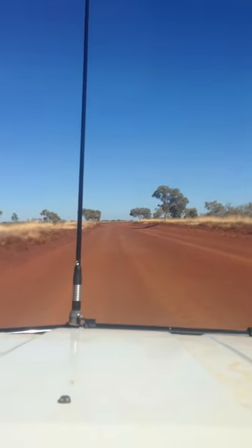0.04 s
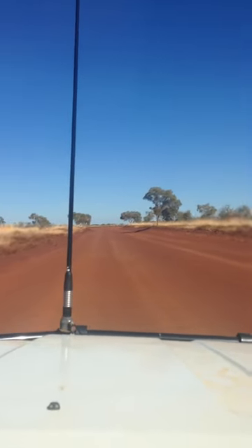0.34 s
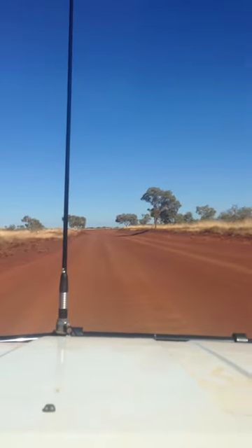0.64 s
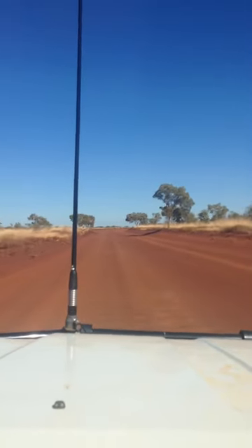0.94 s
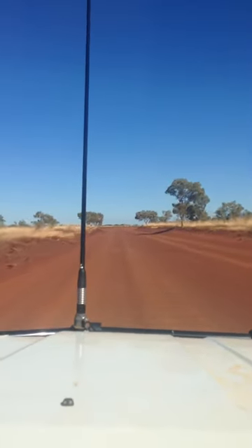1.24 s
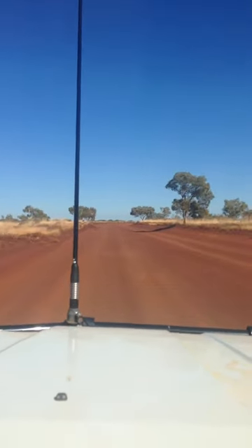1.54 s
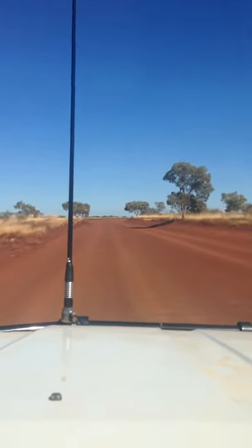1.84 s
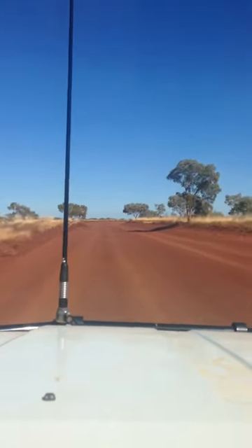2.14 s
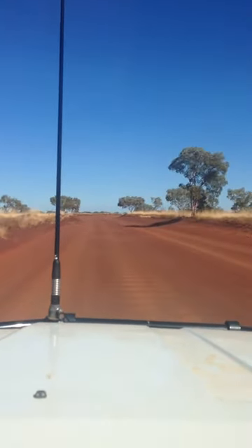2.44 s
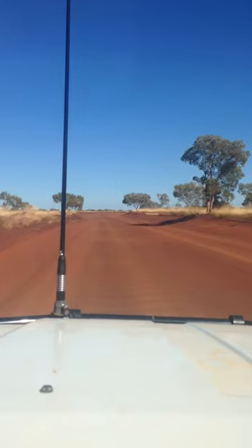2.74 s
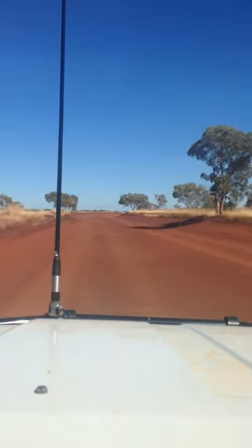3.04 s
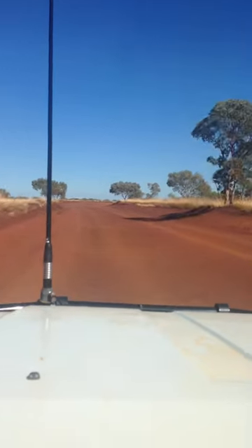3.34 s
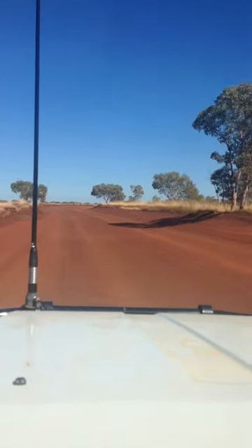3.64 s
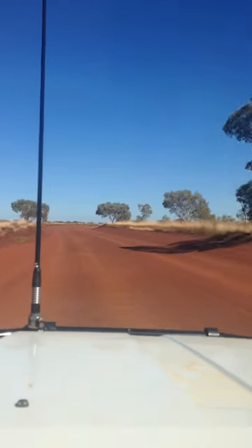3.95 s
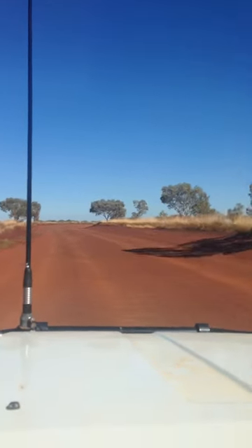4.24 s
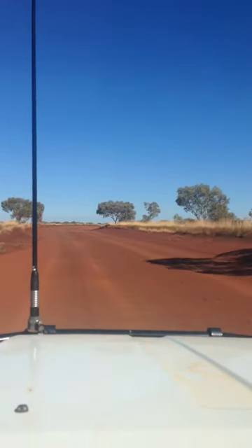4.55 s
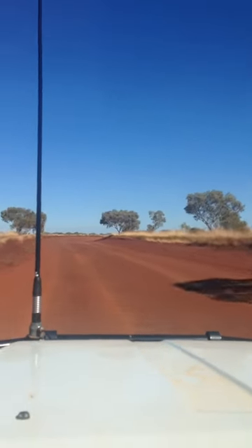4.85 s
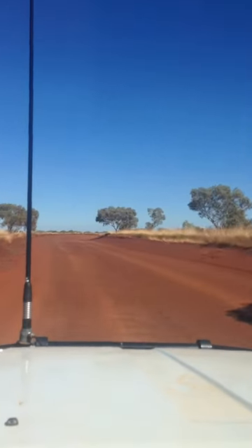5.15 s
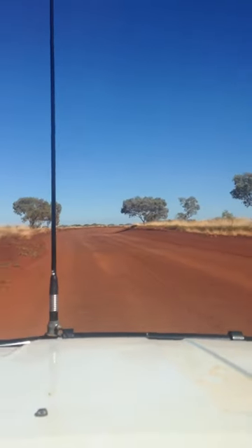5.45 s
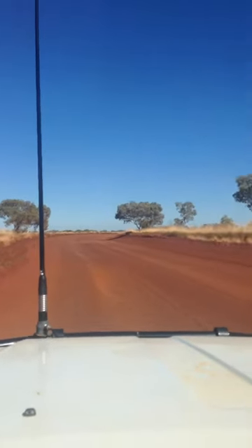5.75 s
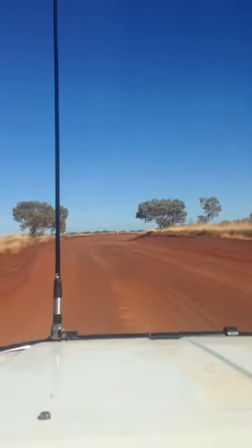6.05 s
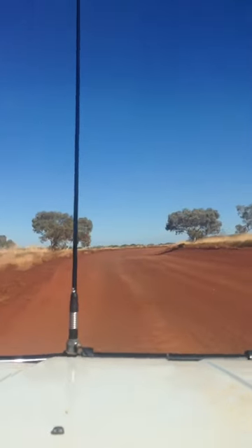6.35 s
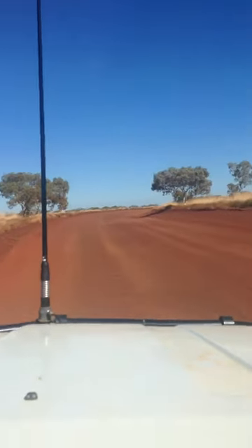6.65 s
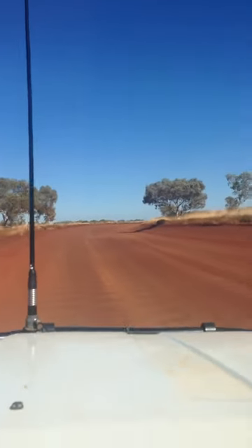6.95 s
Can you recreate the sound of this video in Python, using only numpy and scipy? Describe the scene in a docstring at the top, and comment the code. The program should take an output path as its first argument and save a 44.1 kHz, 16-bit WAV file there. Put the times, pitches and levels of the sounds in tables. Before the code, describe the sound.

A four-wheel drive runs fast along a corrugated dirt road, heard from inside the cab behind the windscreen. A deep boom and drumming panels dominate throughout, with irregular low thuds from ruts several times a second. Soft tyre and air rush and a faint, steady engine hum lie underneath. The first second is mostly rumble and bumps. From about 1 to 1.7 seconds, loose trim and gear rattle and clink close by, then ease to lighter chatter. A stronger burst of clatter comes between 3 and 3.7 seconds. From about 4 to 5.1 seconds the road is rough, with grit spraying and single stones cracking under the floor. Another dense stretch of rattling, knocks and gravel follows from about 5.3 to 6.3 seconds. Tiny, high, scratchy trim squeaks dot the rough patches, and the thuds and rattles carry on to the end at about 7 seconds.

```python
"""Inside a four-wheel drive, fast on a corrugated dirt road; one microphone behind the windscreen.
All around, the road makes the cab boom and its panels drum, and ruts thud through the suspension.
Close by, loose trim and gear rattle, clatter and squeak, most on the rough stretches, where grit
sprays under the floor. Tyre and air rush and a faint engine hum run on in the background."""
import sys
import numpy as np
from scipy import signal
from scipy.fft import rfft, irfft
from scipy.io import wavfile
from scipy.ndimage import uniform_filter1d, minimum_filter1d

SR = 44100
rng = np.random.default_rng(int(sys.argv[2]) if len(sys.argv) > 2 else 0)


def persist_wave(psi):
    """Save psi, clipped to +-1, as 16-bit WAV."""
    counts = np.round(np.clip(psi, -1, 1) * 32767).astype(np.int16)
    wavfile.write(sys.argv[1], SR, np.atleast_2d(counts).T)


N = 312669
TIME = np.arange(N) / SR
# bright spectrum of small hard contacts, for grit and gear: f/Hz, level/dB
BRIGHT_SPECTRUM = [(1500, -23.5), (2800, -7.5), (3300, -0.5), (4000, 1), (5000, -2.5), (6500, -7.5),
                   (8000, -10), (10000, -14), (12500, -17.5), (15500, -23.5)]


def cab_boom(throb):
    """Dips in the road heave the shell on its springs, and the air around the microphone booms."""
    # spectrum of the cab air: f/Hz, level/dB
    spectrum = [(12, -39), (20, -21), (27, -9.5), (34, -9.5), (41, -10), (49, 4), (60, 0), (74, -2.5),
                (88, -7), (115, -7.5), (150, -13.5), (220, -54.5), (500, -120)]
    # dips in the road: t/s, length/s, level/dB
    dips = [(0.06, 0.084, -25), (0.17, 0.46, -22), (1.18, 0.2, -14), (1.45, 0.31, -34), (2.3, 0.24, -19),
            (2.73, 0.16, -15), (3.09, 0.24, -24), (3.37, 0.23, -18), (3.98, 0.41, -17.5),
            (4.42, 0.18, -12.5), (4.68, 0.2, -23.5), (5.02, 0.079, -16), (5.24, 0.57, -23.5),
            (5.93, 0.34, -17.5), (6.38, 0.67, -19.5), (6.95, 0.16, -24)]
    boom = steady(colour(rng.standard_normal(N), spectrum), 0.069) * from_db(0.5 * throb)
    heave = np.sqrt(from_db(-20) ** 2 + stretches(dips))
    return boom * heave


def panel_drumming(drum_db, throb):
    """The road shakes the shell and its panels drum, louder on rough ground."""
    # spectrum of the panels: f/Hz, level/dB
    spectrum = [(60, -36.5), (100, -11), (130, 0), (190, 1.5), (230, -1.5), (270, -7.5), (320, -10),
                (420, -10.5), (520, -14), (750, -22), (1000, -27.5), (2000, -61.5), (6000, -110)]
    drumming = steady(colour(contacts(per_s=1500, spread_db=2.2), spectrum), 0.057)
    return drumming * from_db(-22 + 0.52 * drum_db + 2 * throb)


def rut_thuds():
    """Deep ruts thud up through the suspension."""
    # blows from the ruts: t/s, level/dB, f/Hz
    ruts = [(0.075, -8, 51), (0.327, -11.5, 66), (0.366, -12, 64), (0.488, -12, 59), (0.528, -14, 58.3),
            (0.729, -11.5, 74), (0.975, -8.5, 72), (1.114, -11, 78.4), (1.202, -13, 58.4), (1.34, -8, 67),
            (1.505, -16, 68.6), (1.589, -8.5, 60), (1.64, -9, 67), (1.722, -12, 69), (1.85, -12, 72),
            (1.92, -12, 57.6), (2.069, -13.5, 49), (2.19, -13.5, 55), (2.303, -10, 71), (2.405, -8.5, 58),
            (2.502, -3, 62.5), (2.713, -11, 63), (2.926, -16, 58.5), (3.105, -4.5, 59), (3.204, -9, 56),
            (3.268, -15, 54.7), (3.437, -11, 69), (3.64, -8.5, 59.4), (3.844, -7, 55), (4.008, -10, 67),
            (4.172, -6, 56.7), (4.493, -6.5, 65.6), (4.635, -11.5, 72), (4.79, -11.5, 71.4),
            (4.848, -8, 69.5), (4.928, -6.5, 60.3), (5.238, -9.5, 56.3), (5.366, -15, 63), (5.937, -10, 62),
            (6.101, -10.5, 58.3), (6.195, -7, 56.6), (6.268, -3.5, 62), (6.579, -8, 64.5), (6.657, -7, 60),
            (6.743, -11, 61.5), (6.829, -4, 60.4), (6.906, -11, 69)]
    return knocks(ruts, gain_db=11.5, rise_s=0.011, decay_s=0.015)


def wheel_bumps():
    """A wheel hits a bump and a panel rings."""
    # blows from the bumps: t/s, level/dB, f/Hz
    bumps = [(0.334, -2, 123), (0.504, -8, 124), (0.976, -15, 135), (0.99, -20, 296), (1.048, -20, 373),
             (1.233, -15, 283), (1.333, -11, 150), (1.623, -9, 139), (1.64, -20, 323), (1.717, -11, 148),
             (1.845, -8, 119), (2.038, -11, 134), (2.213, -18.5, 316), (2.34, -19, 364), (2.377, -18, 362),
             (2.572, -13.5, 145), (2.579, -21, 291), (2.72, -13, 196), (3.07, -17, 408), (3.173, -15, 358),
             (3.206, -7, 172), (3.236, -17.5, 306), (3.268, -11.5, 323), (3.352, -16, 273),
             (3.528, -3, 163), (3.988, -14.5, 274), (4.237, -9, 152), (4.239, -12.5, 307),
             (4.479, -5, 163.4), (4.526, -18, 300), (4.557, -7, 138), (4.667, -14, 181),
             (4.824, -10.5, 427), (4.841, -1.5, 159), (4.938, -22, 286), (4.982, -6, 146),
             (5.059, -14, 263), (5.065, -3.5, 129), (5.286, -13, 116), (5.381, -10, 157), (5.396, -9, 350),
             (5.446, -8, 152), (5.541, -8, 175), (5.598, -17.5, 315), (5.837, -15, 305), (5.756, -4.5, 261),
             (5.794, -5.5, 250), (5.906, -13, 330), (5.933, -6, 152), (6.01, -10.5, 280), (6.045, -4, 127),
             (6.089, -9.5, 193), (6.109, -12, 288), (6.166, -4.5, 194), (6.262, -7, 146),
             (6.344, -9.5, 174), (6.514, -9, 120), (6.628, -10.5, 158), (6.685, -5.5, 144),
             (6.687, -14, 370), (6.754, -5.5, 173), (6.809, -9.5, 220), (6.822, -9, 174)]
    return knocks(bumps, gain_db=3, rise_s=0.0048, decay_s=0.011)


def trim_rattle(rough_db, shake):
    """Trim near the microphone chatters in time with the ridges; small hard things jangle along."""
    force = contacts(per_s=8000, spread_db=1.13) * from_db(1.6 * shake + 0.5 * drift(40))
    force += from_db(-9.5) * jangle(count=5000, decay_s=0.0057, spread_db=3.5)
    chatter = cab_tail(loose_parts(force, ring_db=-9, swing_db=7), wet_db=-13)
    return steady(chatter, 0.033) * from_db(-32 + rough_db)


def gear_clatter():
    """Thrown gear lands in a flurry of contacts and chatters to rest; the body answers with a knock."""
    # landings: t/s, level/dB, bright part against that level/dB
    landings = [(0.172, -24, -8), (0.4824, -28, -12), (0.519, -28, -9), (1.031, -18.5, -11),
                (1.221, -10, -5), (1.24, -17, -8), (1.334, -13.5, 1.5), (1.372, -24, -12), (1.468, -21, -3),
                (2.046, -33, -8), (2.345, -16.5, -20), (2.385, -20.5, -15), (3.1266, -20, 1),
                (3.168, -18, 1), (3.202, -14.5, 3), (3.242, -10.5, -5), (3.278, -18, -3), (3.31, -15, -2),
                (3.355, -13.5, 0), (3.376, -15, -8), (3.398, -11.5, -11), (3.447, -11, -6), (3.477, -17, 3),
                (3.659, -13.5, -17), (3.676, -26, -4), (3.714, -16, -14), (3.743, -30, 11),
                (3.9793, -20.5, 3.5), (4.081, -13.5, -4), (4.135, -22, 4), (4.243, -18, 8.5),
                (4.394, -20, -8), (4.417, -16, -2), (4.495, -9, -4), (4.539, -13, -2), (4.9063, -29, 14.5),
                (5.085, -20, -3), (5.26, -24, 0), (5.221, -15, -2.5), (5.387, -12, 4), (5.441, -11, -4),
                (5.462, -18, -7), (5.48, -22, 1), (5.546, -22.5, 6), (5.561, -15.5, -1), (5.63, -19, 2),
                (5.656, -22, 2), (5.72, -20, 5), (5.751, -9.5, 0.5), (5.796, -14, 5), (5.835, -20, -13),
                (6.009, -13.5, 2.5), (6.029, -18.5, -10), (6.055, -13.5, -8), (6.1, -20, -8),
                (6.14, -20, -10), (6.192, -24, 6), (6.316, -20, -13), (6.357, -17.5, -11),
                (6.528, -21, 1.5), (6.686, -25.5, 4), (6.7361, -28, 6), (6.748, -23, -3), (6.809, -15, -11),
                (6.8354, -34, 6), (6.93, -12, -25), (6.95, -33, 11), (6.975, -24, -8), (7.045, -18, -1)]
    times, dull_db, bright_db = np.transpose(landings)

    def flurry(db):
        """Each landing and its quieter settling, spread over 10 ms."""
        hit = bursts(times, db, rise_s=0.0055, decay_s=0.0071)
        settle = bursts(times, db - 19, rise_s=0.0071, decay_s=0.018)
        return uniform_filter1d(hit + settle, int(0.01 * SR) + 1)

    force = contacts(per_s=6000, spread_db=2.4) * flurry(dull_db)
    dull = loose_parts(force, ring_db=-5, swing_db=3)
    bright_force = contacts(per_s=9000, spread_db=1.8) * flurry(dull_db + bright_db)
    bright = colour(bright_force, BRIGHT_SPECTRUM)
    knock = from_db(21.5) * hollow_body(force)
    return from_db(-9) * cab_tail(dull + knock + bright, wet_db=-9.5)


def gear_jostle(rough_db, shake):
    """Heavier gear keeps knocking against the body, most of all on the ridges."""
    force = contacts(per_s=900, spread_db=2.9) * from_db(1.5 * shake)
    return steady(hollow_body(force), 0.036) * from_db(-31 + rough_db)


def part_taps():
    """A small part rings briefly with a close pair of partials, buzzing against its seat."""
    # single taps and clinks: t/s, f/Hz, level/dB
    taps = [(0.173, 1550, -35), (0.476, 3090, -35), (0.487, 1510, -32), (0.543, 824, -31),
            (0.617, 3080, -36), (0.732, 3100, -45), (1.036, 1550, -29), (1.078, 1550, -28),
            (1.228, 1590, -19), (1.185, 1590, -29), (1.27, 1630, -28), (1.31, 1160, -25),
            (1.344, 1564, -23), (1.385, 1590, -34), (1.47, 3620, -34), (1.495, 3320, -37),
            (1.622, 1400, -25.5), (1.656, 3250, -38), (1.738, 3620, -38.5), (1.956, 770, -32),
            (2.04, 1545, -36), (2.237, 1525, -31.5), (2.388, 1680, -31), (2.564, 1470, -29),
            (2.596, 1600, -33), (2.795, 1560, -36), (2.833, 1580, -31), (3.025, 1570, -31),
            (3.09, 1510, -32), (3.133, 1590, -34), (3.149, 1560, -33), (3.174, 1510, -22),
            (3.197, 1650, -29), (3.213, 1650, -26), (3.245, 1610, -38), (3.316, 1480, -27),
            (3.375, 1710, -20), (3.402, 1470, -26), (3.449, 1650, -29), (3.478, 1160, -19),
            (3.647, 990, -21), (3.672, 1280, -32), (3.683, 3220, -29), (3.716, 980, -24),
            (4.019, 1690, -24.5), (4.08, 1493, -22), (4.092, 3190, -28), (4.099, 1520, -21),
            (4.244, 2000, -25), (4.421, 1360, -27), (4.529, 1670, -23), (4.62, 1550, -29),
            (4.703, 1206, -26), (5.048, 2010, -25), (5.898, 1470, -30), (6.079, 1550, -26),
            (6.19, 1190, -26), (5.445, 1896, -19.5), (5.562, 2790, -31), (5.566, 1695, -25),
            (5.773, 1730, -21), (6.013, 3700, -25), (6.026, 1610, -25), (6.06, 780, -22), (6.145, 780, -29),
            (6.77, 1500, -26), (6.808, 1223, -25.5), (6.976, 1850, -25)]
    out, buzz = np.zeros(N), 0.97 * drift(380)
    for s, hz, db in taps:
        span = slice(int(s * SR), int(s * SR) + SR // 10)
        phase = 2 * np.pi * hz * (TIME[span] - s)
        ring = np.sin(phase + buzz[span]) + from_db(-8.5) * np.sin(1.11 * phase - buzz[span])
        out[span] += bursts([s], [db + 5.5], rise_s=0.0024, decay_s=0.0061)[span] * ring
    return out


def trim_squeaks():
    """Trim sticks and slips for a few milliseconds with a high, scratchy chirp."""
    # rubs: t/s, f/Hz, level/dB, resonance width/Hz
    rubs = [(1.15, 9200, -37.5, 600), (1.436, 9570, -41, 700), (1.516, 9800, -53, 600),
            (1.555, 9200, -47, 700), (1.6, 13890, -39, 260), (1.665, 9150, -38, 700),
            (1.699, 9400, -48, 500), (2.356, 9180, -47, 600), (3.098, 9900, -40, 800),
            (3.217, 9560, -33, 600), (3.25, 9500, -34, 800), (3.281, 6650, -29, 1100),
            (4.104, 9500, -30.5, 1200), (4.706, 9800, -38, 800), (4.754, 9750, -41, 700),
            (4.798, 9900, -35, 700), (5.076, 9700, -34, 700), (5.286, 13830, -46, 300),
            (5.637, 6650, -30, 1100), (6.029, 9250, -43, 700), (6.073, 10150, -36, 600),
            (6.105, 9830, -36, 700), (6.236, 9400, -39, 600), (6.337, 10100, -41, 500),
            (6.374, 9280, -41, 500), (6.41, 9500, -44, 700), (6.507, 9200, -42, 700),
            (6.536, 6400, -34, 500), (6.546, 9550, -42, 600), (6.583, 9550, -41, 500),
            (6.618, 6700, -35, 600), (6.635, 9200, -39, 700), (6.653, 13700, -40, 700),
            (6.694, 6250, -35, 700), (6.75, 9520, -39, 500), (6.819, 9500, -33, 500),
            (7.005, 9450, -36, 600), (7.07, 6600, -31.5, 700), (7.081, 9550, -38, 596)]
    out = np.zeros(N)
    for s, hz, db, width in rubs:
        span = slice(max(int((s - 0.04) * SR), 0), int((s + 0.04) * SR))
        age = TIME[span] - s
        rasp = resonance(rng.standard_normal(len(age)), hz, width)
        chirp = resonance(rasp, hz, width) + from_db(-2) * rasp
        out[span] += from_db(db - 5) * steady(chirp, 0.0058) / np.cosh(age / 0.0033)
    return cab_tail(out, wet_db=-13)


def grit_spray(rough_db, shake, fall_s=0.083):
    """Gravel flung off the tyres ticks and pings under the floor, trailing on after each bad patch."""
    thrown = from_db(rough_db) ** 2
    pole, late_share = np.exp(-1 / (fall_s * SR)), from_db(-7.5) ** 2
    still_flying = signal.lfilter([1 - pole], [1, -pole], thrown)
    spray_db = 10 * np.log10((thrown + late_share * still_flying) / (1 + late_share))
    force = contacts(per_s=10000, spread_db=4.4) * from_db(2.05 * shake + 0.27 * drift(35))
    force += from_db(-9) * jangle(count=3000, decay_s=0.0026, spread_db=7)
    ticks = cab_tail(colour(force, BRIGHT_SPECTRUM), wet_db=-12)
    return steady(ticks, 0.097) * from_db(-38 + 1.36 * spray_db)


def stone_strikes():
    """A single stone cracks on the underbody with a short, broad ring."""
    # strikes: t/s, f/Hz, level/dB
    strikes = [(1.956, 9000, -48), (2.101, 8500, -49), (2.89, 7430, -44), (2.943, 7400, -52),
               (3.17, 7180, -34), (3.476, 7450, -35), (3.634, 3600, -29), (3.979, 6720, -37),
               (4.247, 6000, -27), (4.354, 3420, -27), (4.399, 3740, -21.5), (4.417, 3900, -26),
               (4.865, 3300, -33), (5.089, 3530, -23), (5.393, 4200, -26), (5.447, 3800, -22.5),
               (5.464, 3900, -22), (5.757, 4000, -35), (5.975, 3740, -27.5), (6.403, 3600, -33.5),
               (5.889, 6540, -32), (5.925, 3510, -27), (6.191, 6580, -34), (6.836, 10060, -36)]
    out, age = np.zeros(N + SR // 20), TIME[:SR // 20]
    shape = rise_and_decay(age, rise_s=0.0015, decay_s=0.003)
    for s, hz, db in strikes:
        noise, start = rng.standard_normal(len(age)), int(s * SR)
        ring = resonance(resonance(noise, hz, 0.42 * hz), hz, 0.42 * hz)
        crack = unit_power(ring + from_db(-24) * noise)
        out[start:start + len(age)] += from_db(db + 6) * crack * shape
    return cab_tail(out[:N], wet_db=-7)


def panel_drone():
    """The rolling tyres keep a few panel resonances sounding evenly."""
    # droning panels: f/Hz, width/Hz, level/dB
    modes = [(184.5, 15, -31.5), (290.2, 36.4, -34), (395, 35, -39.5)]
    out, noise = np.zeros(N), rng.standard_normal(N)
    for hz, width, db in modes:
        ring = resonance(resonance(noise, hz, width), hz, width)
        out += from_db(db - 2.5) * steady(ring, 0.047)
    return out


def engine_hum():
    """The engine's low firing harmonics at a steady cruise, wavering with the load."""
    # firing rate: t/s, f/Hz
    firing = [(0, 91.9), (0.7, 93.8), (1.3, 92), (1.8, 95.9), (2.3, 97), (3, 93.85), (7.09, 91.9)]
    # harmonics: multiple of the firing rate, level/dB
    harmonics = [(1, -31.5), (2, -39.5), (3, -41.5)]
    firing_hz = curve(firing) * (1 + 0.0075 * drift(6))
    phase = 2 * np.pi * np.cumsum(firing_hz) / SR
    return sum(from_db(db + 2) * (1 + 0.61 * drift(3.6)) * np.sin(k * phase) for k, db in harmonics)


def tyre_and_air_rush():
    """Tyres and passing air make an even noise behind everything else."""
    # spectrum of the rush inside the cab: f/Hz, level/dB
    spectrum = [(150, -9.5), (250, 1.5), (287, -7.5), (347, -8.5), (420, -0.5), (520, -6.5), (700, -24),
                (1000, -16), (1250, -16), (2100, -30.5), (2700, -29.5), (3900, -39), (6000, -59),
                (15000, -55)]
    return from_db(-39) * colour(rng.standard_normal(N), spectrum)


def washboard(ridge_hz=23.02):
    """Uneven ridges throw the wheels up: a quick rise and slower fall each time, spread 1."""
    ridges = np.cumsum(ridge_hz * np.exp(0.25 * drift(11.82))) / SR
    heights = rng.uniform(0.4, 1, 1000)
    kick = heights[ridges.astype(int) % len(heights)] * np.exp(-2.5 * (ridges % 1))
    kick = uniform_filter1d(kick, size=400)
    return unit_power(kick - kick.mean())


def roughness(patches):
    """How hard the road shakes the vehicle, in dB: the plain surface plus its bad patches."""
    # road between the patches: t/s, roughness/dB (0 is heavy corrugation)
    surface = [(0, -14.5), (0.9, -13.5), (1.5, -10.5), (1.87, -16), (2.15, -15), (2.35, -7.5), (2.7, -12.5),
               (2.95, -12), (3.4, -12.5), (3.87, -9.5), (4.2, -2.5), (4.95, -8), (5.31, -10.5), (5.6, -2),
               (6.25, -4), (6.47, -8.5), (6.87, -10), (7.09, -1.5)]
    patch_power = stretches(patches, attack_s=0.0071, release_s=0.016)
    return 10 * np.log10(from_db(curve(surface)) ** 2 + patch_power)


def stretches(rows, attack_s=0.0048, release_s=0.0067):
    """Power of stretches of road that build up, hold and die away as the wheels cross them."""
    power = np.zeros(N)
    for s, length, db in rows:
        rise = 1 - np.exp(-np.maximum(TIME - s, 0) / attack_s)
        fall = np.exp(-np.maximum(TIME - s - length, 0) / release_s)
        power += (from_db(db) * rise * fall) ** 2
    return power


def knocks(blows, gain_db, rise_s, decay_s):
    """Each blow sets the shell or a panel ringing for a few cycles."""
    out = np.zeros(N)
    for s, db, hz in blows:
        out += bursts([s], [db + gain_db], rise_s, decay_s) * np.sin(2 * np.pi * hz * (TIME - s))
    return out


def loose_parts(force, ring_db, swing_db):
    """Contacts excite the trim; each loose part joins in more or less from moment to moment."""
    # ringing parts: f/Hz, width/Hz, level/dB
    modes = [(1224, 67, 3), (1510, 33, -3.5), (1692, 110, 6), (1970, 77, 2.5), (3210, 104, 9.5),
             (3800, 390, 4.5)]
    # spectrum of the trim: f/Hz, level/dB
    spectrum = [(350, -18), (700, 3.5), (950, 0.5), (1150, 0), (1350, -0.5), (1680, -3), (1950, -4.5),
                (2400, -3), (2800, -10.5), (3300, -12), (4500, -15.5), (8000, -28.5), (15000, -59)]
    rings = sum(resonance(force, hz, width) * from_db(db + swing_db * drift(19))
                for hz, width, db in modes)
    return colour(force + from_db(ring_db) * rings, spectrum)


def hollow_body(force):
    """The hollow body knocks at its low resonances."""
    # body resonances: f/Hz, width/Hz, level/dB
    modes = [(366, 28, 5), (468, 52, 5), (584, 70, 3.5), (769, 33, -3)]
    return sum(resonance(force, hz, width) * from_db(db) for hz, width, db in modes)


def jangle(count, decay_s, spread_db):
    """Screws, clips and stones each ring once with two unrelated partials; unit power."""
    out, age = np.zeros(N + SR // 10), TIME[:SR // 30]
    shape = rise_and_decay(age, 0.001, decay_s)
    for when, weight, *pitches in rng.random((count, 4)):
        hz, start = 450 + 8000 * np.array(pitches) ** 1.5, int(when * N)
        sizes = from_db(-spread_db * np.log(weight + 0.16)) * hz ** (1 / 6)
        out[start:start + len(age)] += shape * (sizes @ np.sin(2 * np.pi * np.outer(hz, age)))
    return unit_power(out[:N])


def contacts(per_s, spread_db):
    """Random tiny impacts of uneven size, unit power."""
    sizes = from_db(spread_db * np.minimum(rng.exponential(1, N), 4)) * rng.choice([-1, 1], N)
    return unit_power(sizes * (rng.random(N) < per_s / SR))


def cab_tail(x, wet_db, t60_s=0.16):
    """The small padded cab adds a short dense tail on the way to the microphone."""
    age, wet = TIME[:SR // 6], from_db(wet_db)
    tail = rng.standard_normal(len(age)) * from_db(-60 * age / t60_s) * (age > 0.002)
    reflections = signal.fftconvolve(x, tail / np.linalg.norm(tail))[:N]
    return (x + wet * reflections) / np.hypot(1, wet)


def bursts(times, levels_db, rise_s, decay_s):
    """An envelope that jumps at each blow and dies away."""
    envelope = np.zeros(N)
    for s, db in zip(times, levels_db):
        start = max(int(s * SR), 0)
        age = TIME[:min(N - start, SR // 4)]
        envelope[start:start + len(age)] += from_db(db) * rise_and_decay(age, rise_s, decay_s)
    return envelope


def rise_and_decay(age, rise_s, decay_s):
    """The envelope of one blow."""
    return (1 - np.exp(-age / rise_s)) * np.exp(-age / decay_s)


def resonance(x, hz, width_hz):
    """Two-pole resonance with gain 1 at its peak."""
    r = np.exp(-np.pi * width_hz / SR)
    gain, poles = (1 - r * r) / 2, [1, -2 * r * np.cos(2 * np.pi * hz / SR), r * r]
    return signal.lfilter([gain, 0, -gain], poles, x + 1e-18)


def colour(x, spectrum, size=16384):
    """Minimum-phase filter with the given spectrum and unit power gain."""
    hz, db = np.transpose(spectrum)
    grid_hz = np.maximum(np.arange(size // 2 + 1) * SR / size, 1)
    gains = from_db(np.interp(np.log(grid_hz), np.log(hz), db))
    cepstrum = irfft(np.log(gains))
    cepstrum[1:size // 2] *= 2  # fold onto positive times: nothing sounds before its cause
    cepstrum[size // 2 + 1:] = 0
    response = irfft(np.exp(rfft(cepstrum)))
    return signal.fftconvolve(x, response / np.linalg.norm(response))[:N]


def steady(x, seconds):
    """Hold the power at 1 over the given time, keeping the faster grain."""
    size = max(int(seconds * SR), 2)
    power = uniform_filter1d(uniform_filter1d(x ** 2, size), size)
    return x / np.sqrt(np.abs(power) + 1e-12)


def drift(rate_hz):
    """Smooth random wander with spread 1."""
    hop, run_in = 40, 2000
    r = np.exp(-2 * np.pi * rate_hz * hop / SR)
    noise = rng.standard_normal(N // hop + run_in + 2)
    slow = signal.lfilter([1], [1, -2 * r, r * r], noise)[run_in:]
    return np.interp(np.arange(N) / hop, np.arange(len(slow)), unit_power(slow))


def curve(points):
    """Join (time, value) points with straight lines."""
    return np.interp(TIME, *np.transpose(points))


def unit_power(x):
    """Scale to a mean square of 1."""
    return x / np.sqrt(np.mean(x ** 2) + 1e-20)


def from_db(db):
    """Decibels to gain."""
    return 10 ** (np.asarray(db) / 20)


def scene():
    """The mix behind the windscreen; the roughness of the road drives panels, trim and grit alike."""
    # bad patches: t/s, length/s, roughness/dB, extra drumming/dB (more on ridges, less on stones)
    patches = [(0.194, 0.3, -38, 18), (0.46, 0.072, -12.5, 7), (1.02, 0.071, -7, -5),
               (1.11, 0.31, -7.5, -3), (1.17, 0.15, -1.5, 2.5), (1.582, 0.11, -7, 0),
               (2.021, 0.036, -10.5, -13), (2.335, 0.073, -10.5, 4), (2.43, 0.19, -13.5, 1),
               (3.01, 0.096, -9.5, 2), (3.072, .1, -6, -4), (3.172, 0.36, -2, 4), (3.273, 0.11, 2, 8.5),
               (3.605, 0.12, -2.5, -12), (3.93, 0.19, -6.5, -2), (4.21, 0.095, -5, -3), (4.362, 0.24, 0, 2),
               (4.678, 0.034, -3.5, -15), (4.798, 0.21, -5, 1.5), (5.008, 0.13, -1.5, -14),
               (5.343, 0.073, -6.5, 8), (5.38, 0.059, -0.5, 0), (5.688, 0.1, 1, -2),
               (5.878, 0.047, -5.5, 11), (6.014, 0.12, -5.5, 3), (6.128, 0.14, -14, 17),
               (6.519, 0.21, -6.5, 2.5), (6.717, 0.11, -2.5, 7.5), (6.922, 0.12, -9.5, -15)]
    # smooth moments that quieten the shell: t/s, length/s, strength/dB (0 takes up to 3 dB off)
    lulls = [(0.83, 0.035, -4), (2.1, 0.18, 0), (2.59, 0.097, -3.5), (2.99, 0.056, 4), (4.62, 0.04, -2),
             (5.14, 0.065, 6), (6.87, 0.11, 2)]
    rough_db = roughness([(s, length, db) for s, length, db, _ in patches])
    drum_db = roughness([(s, length, db + extra_db) for s, length, db, extra_db in patches])
    shake, throb = washboard(), drift(21.5)
    shell = (cab_boom(throb) + panel_drumming(drum_db, throb)) / np.sqrt(1 + stretches(lulls))
    shell += rut_thuds() + wheel_bumps() + gear_jostle(rough_db, shake)
    loose = trim_rattle(rough_db, shake) + grit_spray(rough_db, shake)
    loose += gear_clatter() + part_taps() + trim_squeaks() + stone_strikes()
    background = tyre_and_air_rush() + panel_drone() + engine_hum()
    return (shell + loose + background)[None]


def record(dry):
    """After the microphone, a limiter holds the biggest swings down and the top is cut."""
    ceiling, cutoff_hz = 0.72, 15400
    allowed_gain = np.minimum(1, ceiling / (np.abs(dry) + 1e-9))
    gain = uniform_filter1d(minimum_filter1d(allowed_gain, size=600), size=600)
    low_pass = signal.ellip(12, 0.1, 90, cutoff_hz, fs=SR, output="sos")
    return signal.sosfilt(low_pass, dry * gain)


dry = scene()
out = record(dry)
persist_wave(out)
```